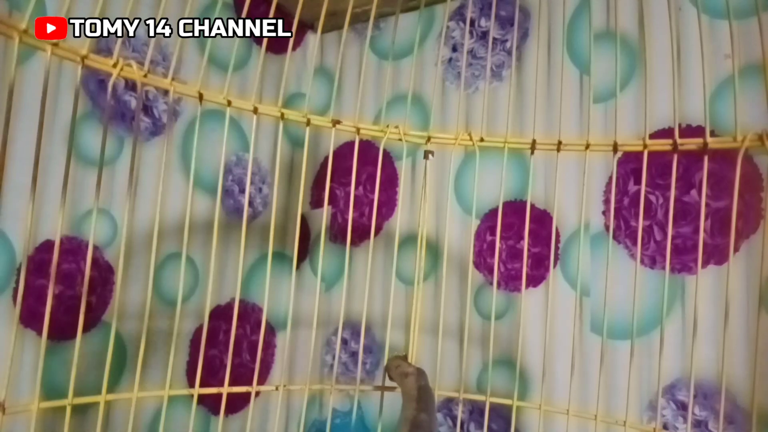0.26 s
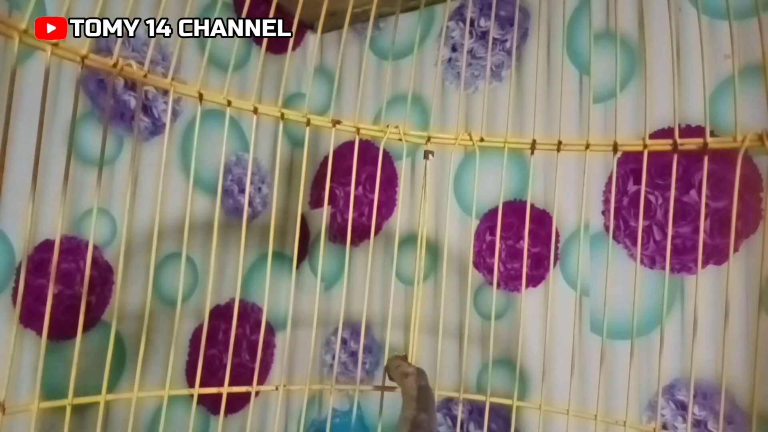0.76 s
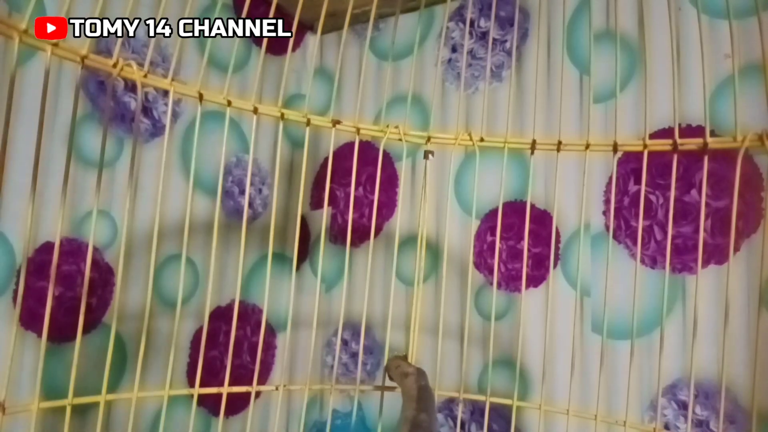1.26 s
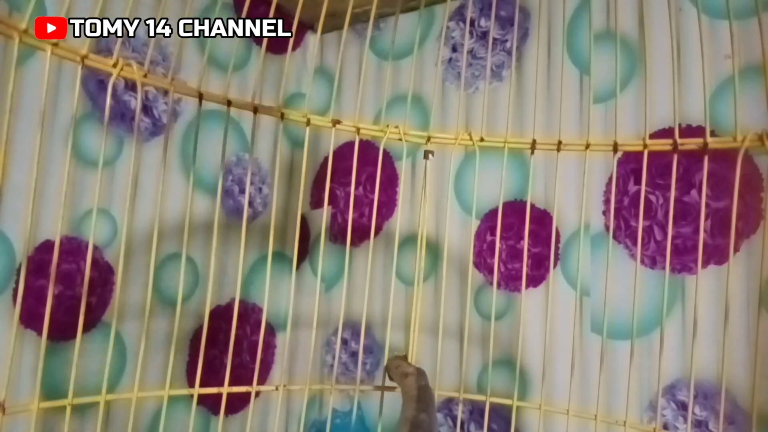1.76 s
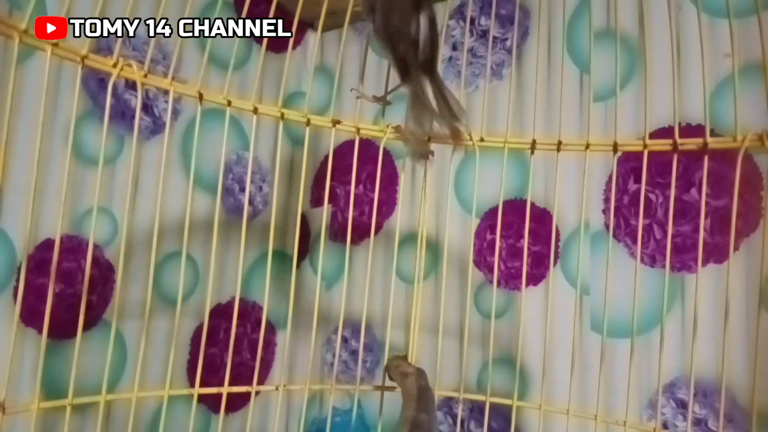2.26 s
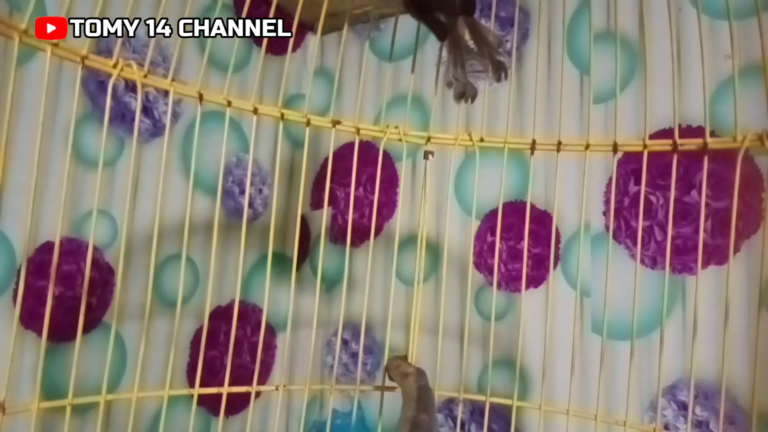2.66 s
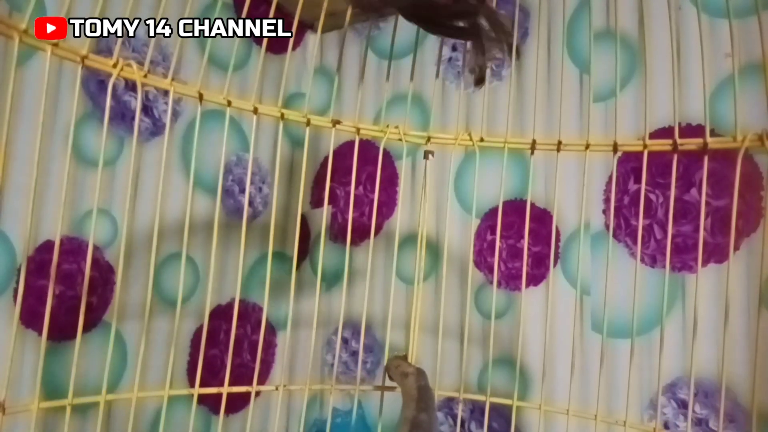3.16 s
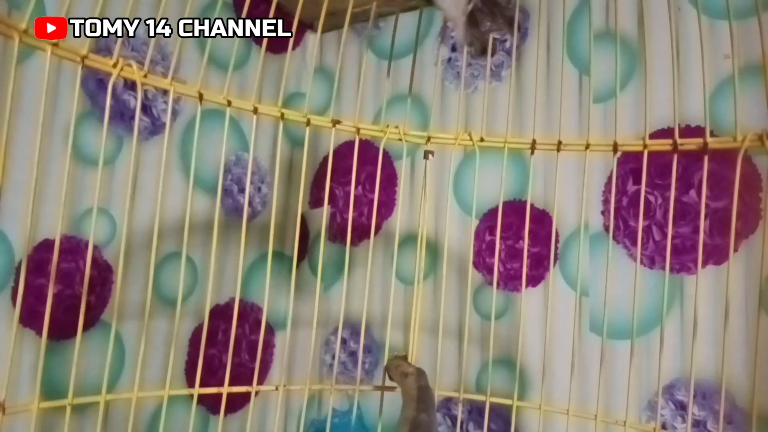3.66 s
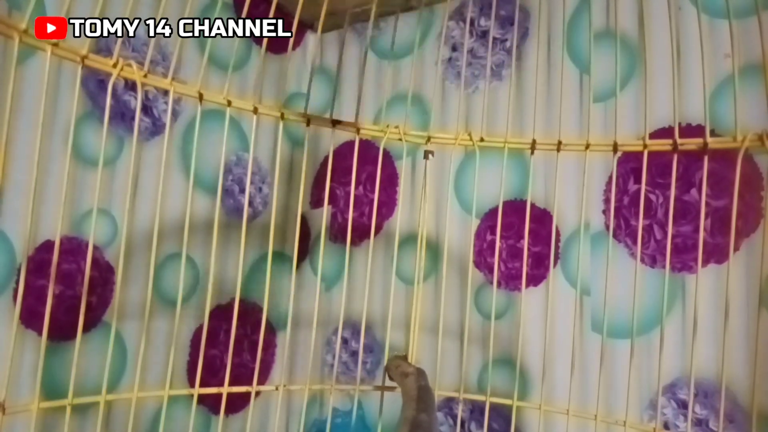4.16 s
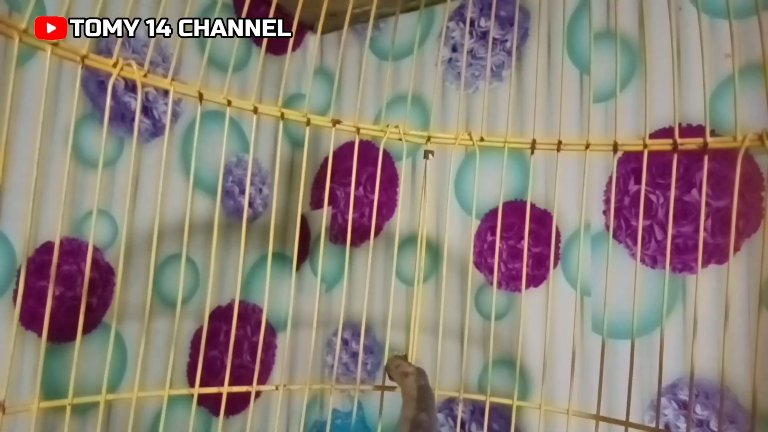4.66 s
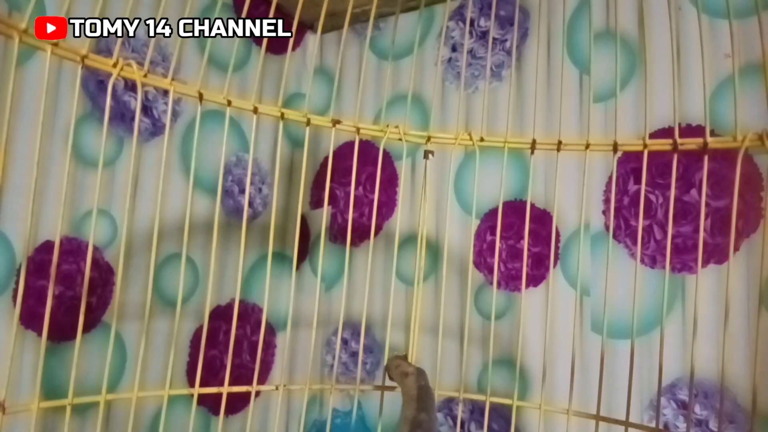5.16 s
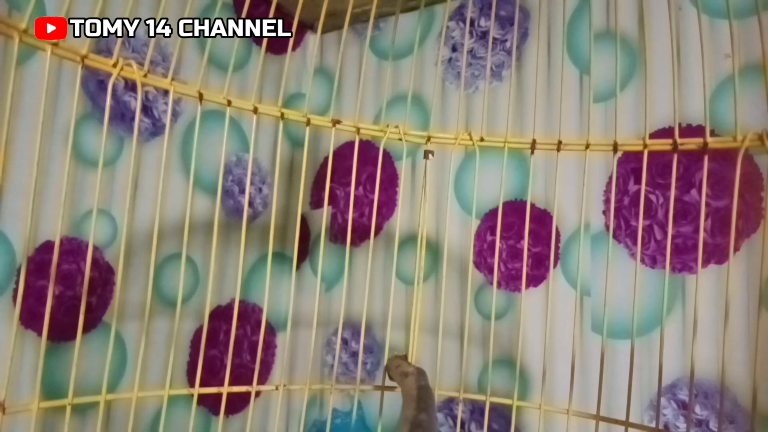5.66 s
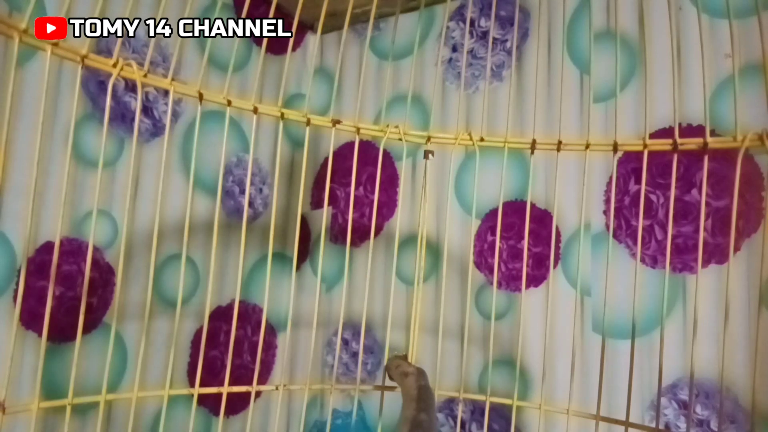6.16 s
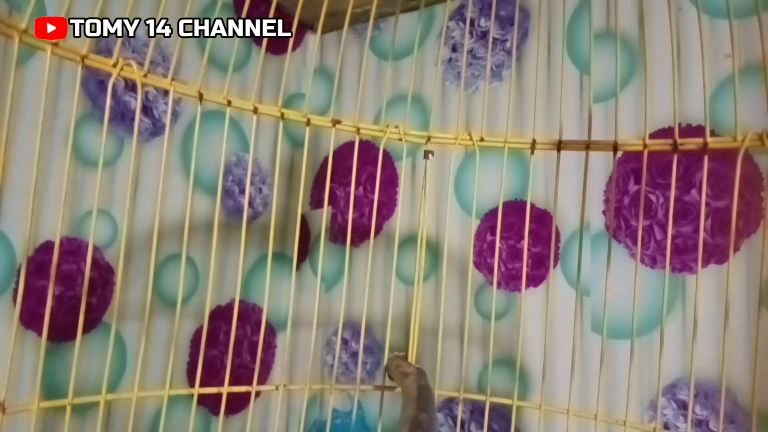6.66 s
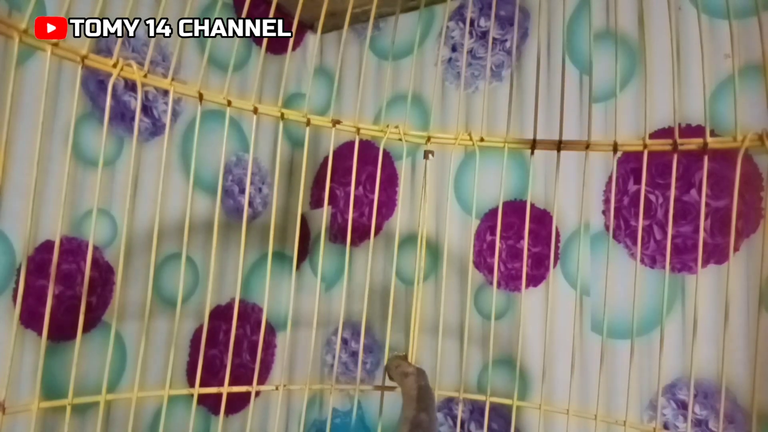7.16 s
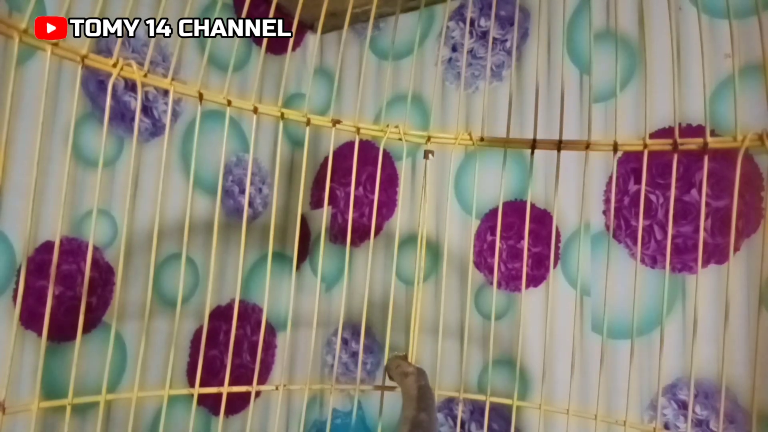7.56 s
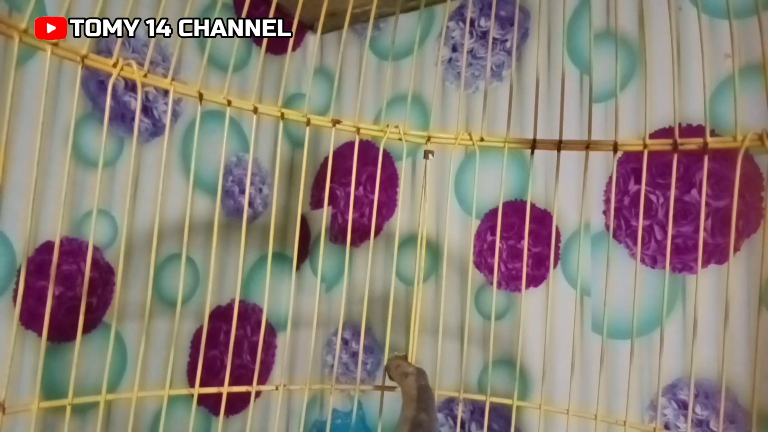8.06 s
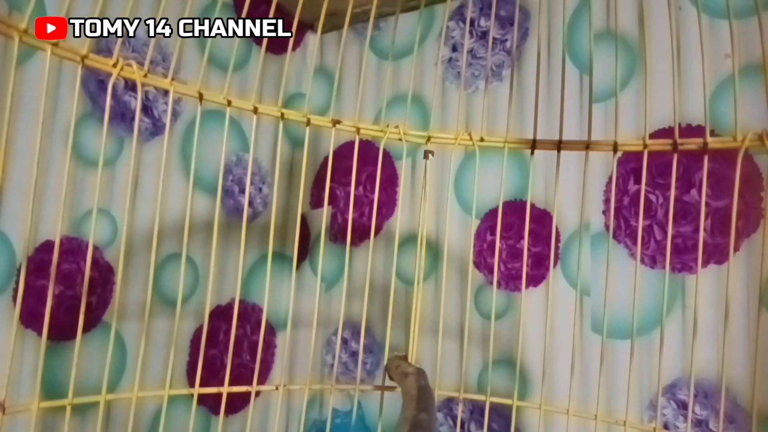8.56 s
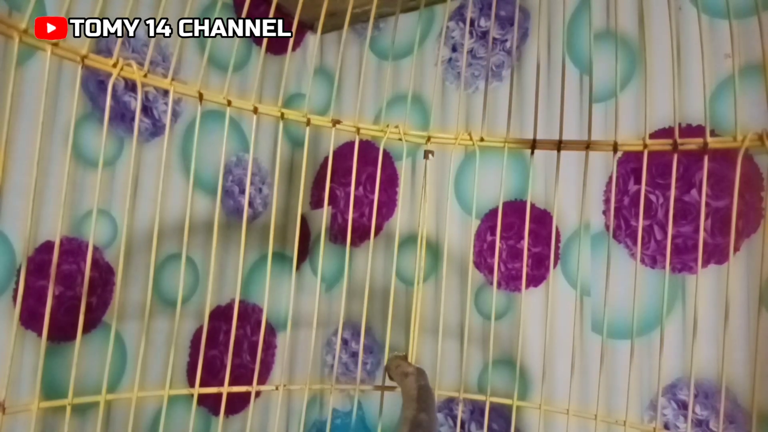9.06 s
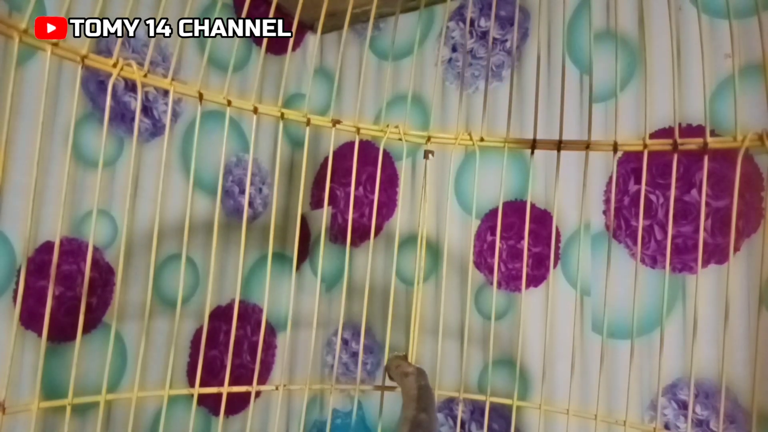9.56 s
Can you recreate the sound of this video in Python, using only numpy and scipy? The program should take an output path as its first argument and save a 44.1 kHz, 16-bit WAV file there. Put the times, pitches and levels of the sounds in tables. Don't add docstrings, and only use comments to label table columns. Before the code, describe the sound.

Close, piercing downward bird chirps run steadily, break briefly amid a perch hop and soft rustles, then start again stronger in a small indoor room.

```python
import sys
import numpy as np
from scipy import signal
from scipy.fft import rfft, irfft
from scipy.io import wavfile
from scipy.ndimage import uniform_filter1d

SR = 44100
rng = np.random.default_rng(int(sys.argv[2]) if len(sys.argv) > 2 else 0)


def file_out(sig):
    cols = np.atleast_2d(sig).T
    lim = np.clip(cols, -1, 1)
    pcm = np.round(lim * 32767).astype(np.int16)
    wavfile.write(sys.argv[1], SR, pcm)


def makeup_ratio(level_db):
    decades = np.asarray(level_db, float) / 20
    return 10 ** decades


N = 432180


def colour(table, hz):
    f, db = np.transpose(table)
    return makeup_ratio(np.interp(np.log(np.maximum(hz, 1)), np.log(f), db))


def band(x, hz, width):
    low, high = max(hz - width / 2, 20), min(hz + width / 2, 20000)
    y = signal.sosfilt(signal.butter(2, [low, high], "band", fs=SR, output="sos"), x)
    return y / np.std(y)


def add(out, s, x):
    i = max(int(s * SR), 0)
    out[i:i + len(x)] += x[:len(out) - i]


def walk(n, rate):
    k = int(SR / rate)
    held = np.repeat(rng.standard_normal(n // k + 2), k)
    return 1.52 * uniform_filter1d(held, k)[:n]


def decay(n, t60):
    return np.exp(-np.log(1000) * np.arange(n) / SR / t60)


def latest(table, s):
    return [row[1:] for row in table if row[0] < s][-1]


NOTE_SAMPLES = 4410

UPPER_PARTIALS = [-15, -6, -15.5]
# (frequency [Hz], level [dB])
TRACT = [(1800, -8.5), (3000, 1), (4300, -2), (6000, 2.5), (7200, -2), (8600, 6.5), (9600, -10),
         (11500, -19), (13500, -15.5), (15500, -11)]


def note_pitch(t, length, end, top_hz, hook_s, hook_share, knee_hz, plunge_hz):
    hook_dip_s, settle_s, plunge_s = 0.0064, .006, .008
    usual_hz, top_kept = 2962, 0.31
    from_hz = usual_hz + top_kept * (top_hz - usual_hz)
    knee = length - plunge_s
    fall = from_hz + (knee_hz - from_hz) * (np.minimum(t, end) - hook_s) / (knee - hook_s)
    fall -= plunge_hz * np.clip((t - knee) / (end - knee), 0, 1) ** 2
    to_top = np.clip((hook_s - t) / max(hook_s - hook_dip_s, .001), 0, 1)
    hook = (1 - (1 - hook_share) * to_top ** 2.4) * top_hz
    settling = fall + (top_hz - from_hz) * np.exp(-(t - hook_s) / settle_s)
    hz = np.where(t < hook_s, hook, settling)
    return uniform_filter1d(hz, 90) * (1 + 0.005 * walk(NOTE_SAMPLES, 300))


def note_level(t, length, soft_db):
    swell_s, tire, usual_db = .017, .3, 28
    fade_s, fade_db, waver_db = .01, 5.5, 2
    opening = -(0.59 * soft_db + 4) * np.exp(-(t / swell_s) ** 2) - 14 * np.exp(-t / 0.002)
    tiring = tire * (soft_db - usual_db) * (t / length - .5)
    fade = -fade_db * np.clip((t - length) / fade_s + 1, 0, 2)
    return opening + tiring + fade + waver_db * walk(NOTE_SAMPLES, 81)


def note(length, top_hz, soft_db, first_db, fourth_db, hook_s, hook_share, knee_hz, plunge_hz):
    t = np.arange(NOTE_SAMPLES) / SR
    end = length + 0.0042
    hz = note_pitch(t, length, end, top_hz, hook_s, hook_share, knee_hz, plunge_hz)
    phase = 2 * np.pi * np.cumsum(hz) / SR
    edge = np.sqrt(2) * np.clip(t / 0.0011, 0, 1) * np.clip((end - t) / 0.0063, 0, 1)
    shape_db = note_level(t, length, soft_db)
    level = makeup_ratio(shape_db) / colour(TRACT, 2 * hz)

    third_db = -19 + .4 * fourth_db
    partials = [0, third_db, fourth_db, *(fourth_db + np.array(UPPER_PARTIALS))]
    stack = np.zeros(NOTE_SAMPLES)
    for number, db in enumerate(partials, start=2):
        brighten_db = 0.33 * shape_db if number > 2 else 0
        gain = makeup_ratio(db + brighten_db + 1.42 * walk(NOTE_SAMPLES, 200))
        stack += gain * colour(TRACT, number * hz) * np.sin(number * phase)
    breath = band(rng.standard_normal(NOTE_SAMPLES), 9000, 7800) * makeup_ratio(-37)

    body_db = first_db - 1 - 5 * t / length + 0.038 * shape_db + 2.2 * walk(NOTE_SAMPLES, 150)
    first = colour(TRACT, hz) * np.sin(phase)
    click = band(band(rng.standard_normal(NOTE_SAMPLES), 3200, 1300), 3200, 1300)
    opening = makeup_ratio(8) * decay(NOTE_SAMPLES, .022)
    shutting = makeup_ratio(-3) * makeup_ratio(-60 * abs(end - t) / .05)
    tick = click * (opening + shutting)
    return edge * (level * (stack + breath) + makeup_ratio(body_db) * (first + tick))


def early_echoes(dry, room_db):
    n = 5000
    scatter = rng.standard_normal(n) * decay(n, 0.22)
    scatter *= np.clip(np.arange(n) / SR / 0.00089, 0, 1)
    heard = signal.fftconvolve(dry, scatter) * makeup_ratio(room_db - 11.5)
    add(heard, 0, dry)
    lags_s = np.array([.0022, .0045, .007, .011]) * (1 + .3 * rng.standard_normal(4))
    for lag_s, share in zip(lags_s, rng.uniform(.5, 1, 4)):
        add(heard, abs(lag_s), dry * share * makeup_ratio(room_db + 14))
    return heard


def room_tail(send):
    n = 30000
    noise = rng.standard_normal(n)
    low, high = band(noise, 7800, 9800), band(noise, 15000, 7000)
    tail = low * decay(n, 0.43) + makeup_ratio(-4.5) * high * decay(n, 0.27)
    return signal.fftconvolve(send, tail) * makeup_ratio(-30.0)


# (start [s], length [s], top pitch [Hz], level [dB], softer opening [dB])
FIRST_RUN = [(-.048, 0.068, 3129, -13, 12), (0.218, 0.067, 3224, -14, 16.5),
             (0.4392, 0.065, 3140, -14.5, 5.5), (.673, 0.064, 3165, -13.5, 10),
             (0.9354, 0.067, 3075, -15.5, 10), (1.1585, 0.063, 3210, -14, 14),
             (1.3951, 0.064, 3103, -14, 7), (1.6152, .066, 3180, -16, 6.5),
             (1.825, 0.062, 3040, -16.5, 22.5), (2.159, .071, 2930, -17.5, 30.5),
             (2.4055, 0.065, 2956, -15.5, 40), (2.6383, 0.063, 3134, -15, 23),
             (2.8556, 0.065, 3070, -17, 8.5), (3.0636, 0.06, 3060, -15.5, 1.5),
             (3.287, 0.063, 3014, -14.5, 17.5)]
LONE_NOTES = [
    (4.452, .062, 3180, -25, 28),
    (5.092, 0.066, 3200, -19.5, 22),
    (5.4324, 0.066, 2840, -17.5, 22),
]
SECOND_RUN = [(5.8623, 0.066, 3110, -10, 29.5), (6.1267, 0.067, 3070, -12, 20),
              (6.3886, .065, 2924, -13, 14), (6.7114, 0.067, 2960, -15, 23),
              (6.9448, 0.067, 3075, -13.5, 28), (7.1956, 0.065, 2960, -14.5, 22.5),
              (7.522, 0.066, 2950, -14.5, 19), (7.784, 0.062, 3055, -11, 18.3),
              (8.0438, .061, 3104, -11, 17.4), (8.2924, 0.067, 3060, -12, 9.5),
              (8.5397, 0.067, 3117, -15, 8.2), (8.8476, 0.061, 3050, -15, 17.3),
              (9.0956, 0.063, 3120, -13.5, 15.5), (9.3499, 0.068, 2990, -15.5, 28),
              (9.5797, 0.065, 3110, -14.5, 27)]
# (from [s], first partial [dB], fourth partial [dB], room share [dB])
PERCHES = [(-.1, -24, -7, -23), (1.3, -23, -5, -23), (2.1, -22, -7.5, -23), (2.6, -22.5, -10.5, -22.5),
           (3.2, -26.5, -14.5, -22.5), (4.4, -22.5, -18, -28.5), (5, -22, -20.5, -29),
           (5.8, -24.5, -11.5, -33), (6.3, -24, -12, -28.5), (6.6, -23.5, -13.5, -24.5),
           (7.1, -26.5, -11, -23), (7.7, -28, -7.5, -25), (8.4, -24.5, -6.5, -23.5),
           (8.7, -25.5, -10.5, -24), (9.3, -23, -17.5, -22.5), (9.5, -27, -11, -23.5)]
# (from [s], hook length [s], hook start [share of top pitch],
# pitch before the last bend [Hz], plunge [Hz], below 0 it levels off)
MANNERS = [(-.1, 0.013, 0.89, 2200, -90), (1.1, .01, 0.93, 2197, -90), (2.1, 0.013, 0.97, 2230, 248),
           (2.6, .014, .92, 2190, 100), (2.8, 0.0097, 0.97, 2157, 100), (3, 0.01, 0.94, 2195, -40),
           (3.2, 0.0099, 1, 2256, 150), (4.4, 0.0022, 0.9, 2027, 200), (5, 0.0054, 0.94, 2064, 556),
           (5.3, 0.0097, 0.98, 2086, 499.5), (5.8, .011, .93, 2172, 299), (6.3, 0.014, 0.91, 2238, -80),
           (6.6, .012, 0.95, 2167, 120), (7.1, 0.016, 0.91, 2260, 100), (7.4, .013, .94, 2194, 120),
           (7.7, 0.015, .91, 2210, -37), (8.7, .013, 0.91, 2234, -57), (9.3, .011, .93, 2224, 80)]


def bird():
    lead = 4410
    near, send = np.zeros(N + lead), np.zeros(N + lead)
    core = slice(int(.022 * SR), int(.06 * SR))
    for s, length, top_hz, db, soft_db in FIRST_RUN + LONE_NOTES + SECOND_RUN:
        first_db, fourth_db, room_db = latest(PERCHES, s)
        dry = note(length, top_hz, soft_db, first_db, fourth_db, *latest(MANNERS, s))
        heard = early_echoes(dry, room_db)
        gain = makeup_ratio(db) / np.std(heard[core])
        add(near, s + lead / SR, heard * gain)
        add(send, s + lead / SR, dry * gain * makeup_ratio(room_db))
    return near[lead:], room_tail(send)[lead:N + lead]


# (frequency [Hz], level [dB per Hz])
AIR_COLOUR = [(30, -31), (45, -10), (120, -3), (480, -1), (800, -7), (1800, -8.5), (3300, -8), (5500, -22),
              (8300, -12.5), (11500, -24), (15500, -30.5)]
# (time [s], level [dB])
STIR = [(0, 6.5), (.35, 1), (1.47, -0.5), (2.05, 2.5), (3.3, 0), (3.47, 0.5), (4.15, -6.5), (4.28, -0.5),
        (4.4, -4.5), (4.72, -2), (5.46, -3), (5.85, -2), (6.17, -3.5), (6.66, 1.8), (7.53, 1.4),
        (8.24, 0.5), (9.39, -1.5), (9.8, 1)]
# (level at rest [dB], share of stirring followed [1], own slow drift [dB])
LAYERS = [
    (-57.5, .9, 1.45),
    (-59, 1.1, 2),
    (-63.5, 1.2, 2.1),
]
# (frequency [Hz], level [dB])
HUM = [(53, -72), (99.5, -65), (490, -68), (674, -75), (1721, -74), (1852, -72.5), (1935, -83)]


def air():
    t = np.arange(N) / SR
    stir_db = np.interp(t, *np.transpose(STIR))
    hz = np.fft.rfftfreq(N, 1 / SR)
    noise = rfft(rng.standard_normal(N)) * colour(AIR_COLOUR, hz)
    out = np.zeros(N)
    ranges = [(25, 1500, 1.8), (1500, 5000, 3), (5000, 16500, 3)]  # (from Hz, to Hz, flicker dB)
    for (db, share, drift_db), (lo, hi, flicker_db) in zip(LAYERS, ranges):
        edges = np.geomspace(lo, hi, 9)
        part = np.zeros(N)
        for a, b in zip(edges, edges[1:]):
            part += irfft(noise * (hz >= a) * (hz < b), N) * makeup_ratio(flicker_db * walk(N, 11))
        level_db = db + share * stir_db + drift_db * walk(N, 2) + 1.2 * walk(N, 14)
        out += part / np.std(part) * makeup_ratio(level_db)
    swell = makeup_ratio(.7 * stir_db)
    for f, db in HUM:
        tone = np.sin(2 * np.pi * f * t + .6 * walk(N, 9))
        out += swell * makeup_ratio(db + 2.5 + 2.2 * walk(N, 9)) * tone
    return out


# (start [s], length [s], centre [Hz], width [Hz], level [dB])
NOISE_BANDS = [(0.08, 0.072, 750, 900, -49.5), (1.9, .2, 16000, 8000, -59.5), (2.115, 0.034, 3700, 900, -65),
               (4.513, 0.15, 430, 150, -59.5), (8.727, 0.085, 490, 220, -47.5), (3.635, 0.048, 3800, 600, -58),
               (3.685, 0.097, 3380, 1500, -55), (4.031, 0.088, 2150, 1600, -57.5),
               (4.379, 0.067, 3400, 840, -58.5), (4.578, 0.068, 1750, 1600, -56),
               (4.698, 0.049, 2500, 3000, -55), (4.832, 0.11, 1800, 1500, -55), (5.192, 0.12, 2800, 2200, -60),
               (5.21, .06, 13600, 1800, -63), (5.682, 0.087, 2860, 1600, -54.5),
               (6.486, 0.18, 2600, 3000, -51.5), (6.469, 0.078, 55, 67, -56), (7.978, 0.072, 2070, 500, -54),
               (8.69, 0.074, 1500, 600, -56.5), (6.9, 1.9, 52, 15, -63.5), (5.55, 0.22, 9500, 8500, -63.5),
               (1.88, 0.21, 110, 58, -57.5), (6.05, 0.41, 450, 280, -68.5), (8.047, 0.12, 460, 220, -59)]


def noise_bands(out):
    for s, length, hz, width, db in NOISE_BANDS:
        n = int(length * SR)
        noise = band(rng.standard_normal(n), hz, width)
        add(out, s, makeup_ratio(db + 0.99 * walk(n, 81)) * noise * np.hanning(n) ** 0.23)


def wing_draught(out):
    start_s, end_s = 1.86, 2
    n = int((end_s - start_s) * SR)
    add(out, start_s, makeup_ratio(-48.5) * band(rng.standard_normal(n), 144, 312) * np.hanning(n) ** 0.12)


# (time [s], level [dB], centre [Hz], width [Hz], t60 [s])
TAPS = [(1.965, -38.5, 300, 600, 0.054), (1.97, -54, 8000, 8000, .03), (1.998, -41, 7000, 9000, 0.033),
        (2.006, -29.5, 500, 900, 0.013), (2.036, -43.5, 3960, 900, 0.078), (2.037, -45, 7900, 900, 0.084),
        (2.049, -47, 9190, 900, .1), (2.115, -50.5, 8500, 2000, 0.26), (2.575, -53, 8550, 3000, .06),
        (3.754, -56, 8540, 3000, 0.46), (3.82, -51, 7740, 2920, 0.41), (3.99, -53.5, 5980, 8820, 0.039),
        (7.45, -48.5, 8800, 4950, 0.25)]


def taps(out):
    n = 9000
    for s, db, hz, width, t60 in TAPS:
        add(out, s, makeup_ratio(db) * band(rng.standard_normal(n), hz, width) * decay(n, t60))


# (start [s], length [s], frequency [Hz], level [dB])
HOOTS = [
    (3.468, 0.083, 634, -56),
    (3.8, 0.075, 495, -61.5),
    (4.21, 0.041, 424, -54.5),
    (4.275, 0.042, 435, -53.5),
    (4.519, 0.12, 423, -52),
    (5.783, 0.062, 434, -54.5),
    (8.747, 0.083, 435, -47),
    (8.93, 0.04, 500, -64),
]


def hoots(out):
    for s, length, hz, db in HOOTS:
        t = np.arange(int(length * SR)) / SR
        tone = np.sin(2 * np.pi * hz * (t - 0.028 * t ** 2 / length))
        add(out, s, makeup_ratio(db + 1.5 + 3.3 * walk(len(t), 62)) * np.hanning(len(t)) ** .5 * tone)


# (from [s], to [s], level [dB])
GATE = [
    (3.514, 3.687, -7),
    (3.89, 4.013, -5),
    (4.127, 4.226, -5.5),
    (4.307, 4.325, -31),
    (4.322, 4.453, -4.5),
    (4.658, 5.09, -7.5),
    (5.299, 5.448, -7),
    (6.075, 6.117, -6.5),
    (9.307, 9.357, -7),
]


def noise_gate():
    gate_db = np.zeros(N)
    for a, b, db in GATE:
        gate_db[int(a * SR):int(b * SR)] = db
    return makeup_ratio(uniform_filter1d(gate_db, 150))


# (frequency [Hz], level [dB])
BARS = [(4900, -65.5), (7750, -61.5), (9400, -65.5), (13400, -68), (15400, -79)]


def bars(out):
    start_s, end_s = 4.25, 4.31
    n = int((end_s - start_s) * SR)
    for hz, db in BARS:
        add(out, start_s, makeup_ratio(db - 7.5) * band(rng.standard_normal(n), hz, 150))


def scene():
    near, tail = bird()
    background = tail + air()
    for source in (noise_bands, wing_draught, taps, hoots, bars):
        source(background)
    return (near + background * noise_gate())[None]


def top_cut(x):
    return signal.sosfilt(signal.butter(12, 16810, fs=SR, output="sos"), x)


def record(dry):
    rounded = dry / (1 + (dry / .9) ** 6) ** (1 / 6)
    low_pass = signal.ellip(10, .3, 80, 15750, fs=SR, output="sos")
    mix = signal.sosfilt(low_pass, rounded)
    return top_cut(mix)


dry = scene()
out = record(dry)
file_out(out)
```